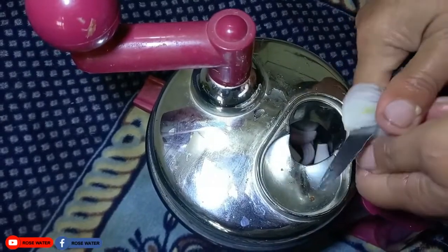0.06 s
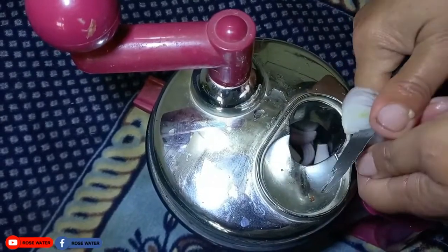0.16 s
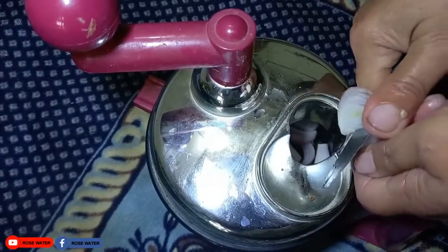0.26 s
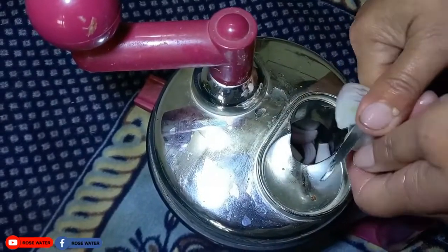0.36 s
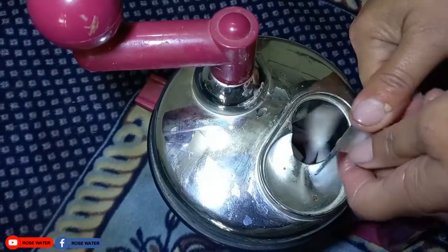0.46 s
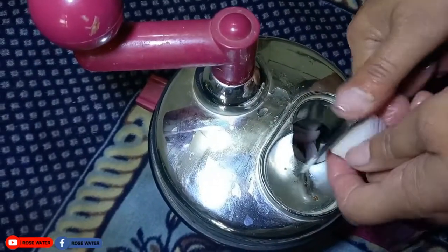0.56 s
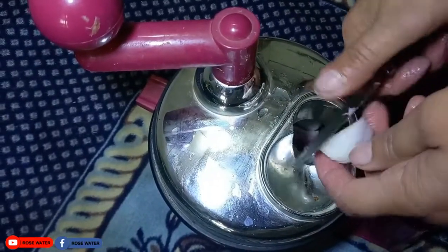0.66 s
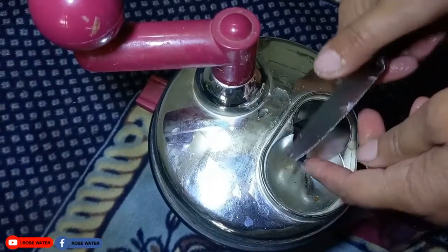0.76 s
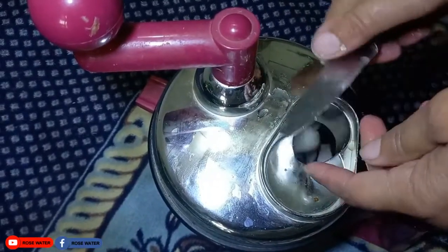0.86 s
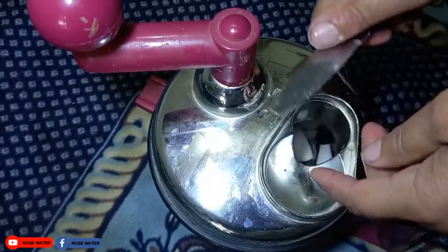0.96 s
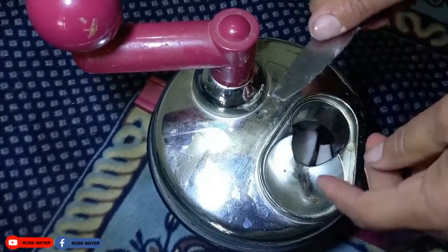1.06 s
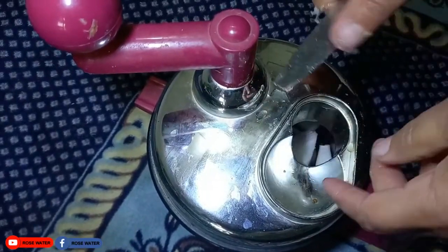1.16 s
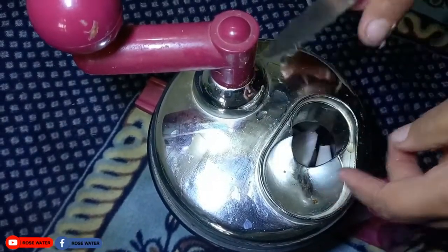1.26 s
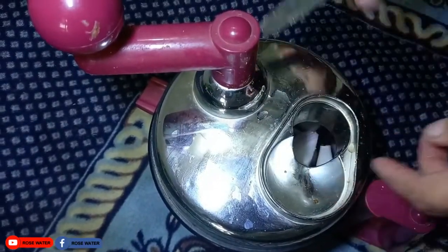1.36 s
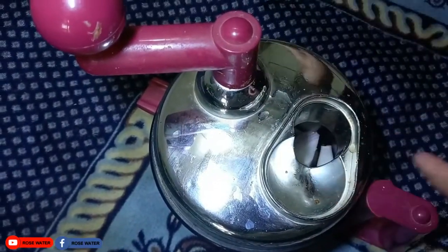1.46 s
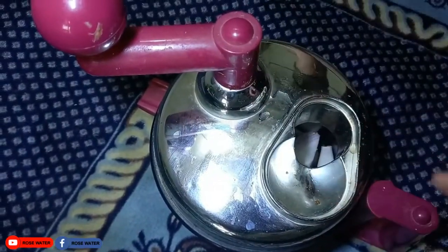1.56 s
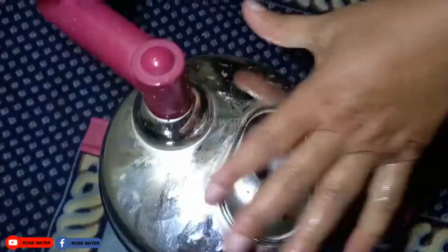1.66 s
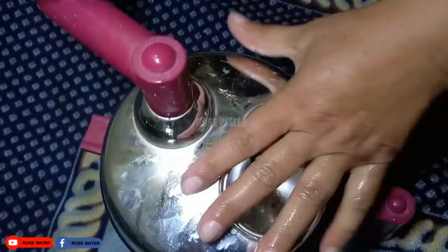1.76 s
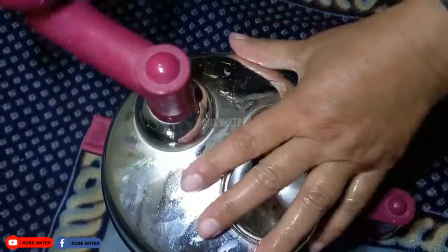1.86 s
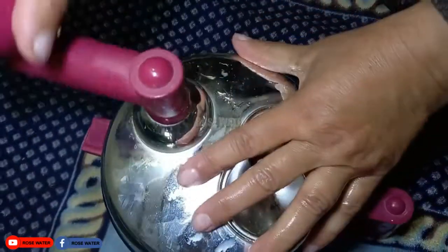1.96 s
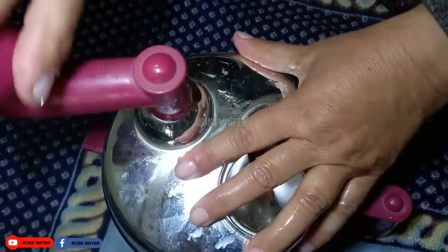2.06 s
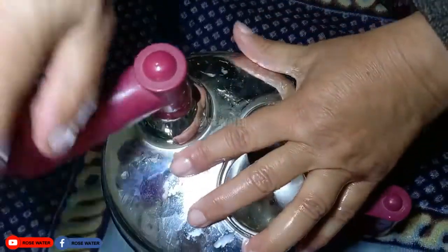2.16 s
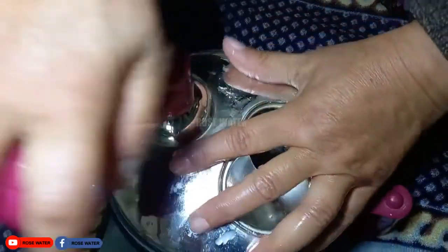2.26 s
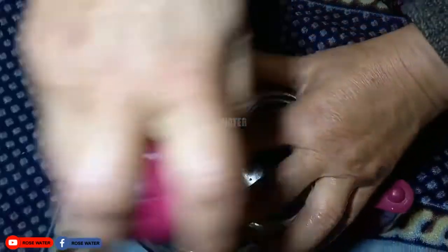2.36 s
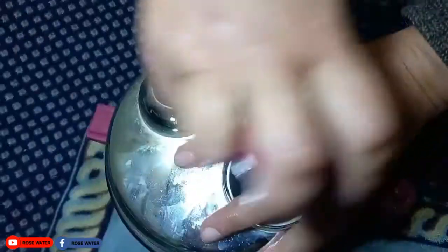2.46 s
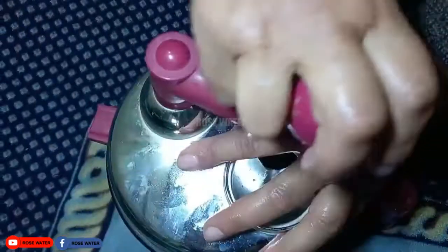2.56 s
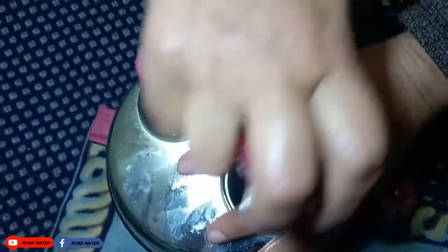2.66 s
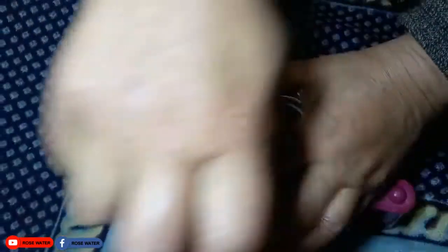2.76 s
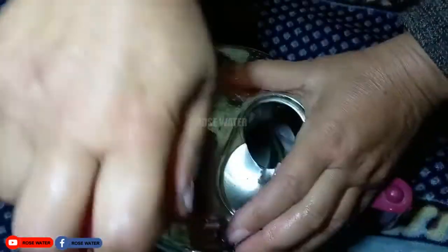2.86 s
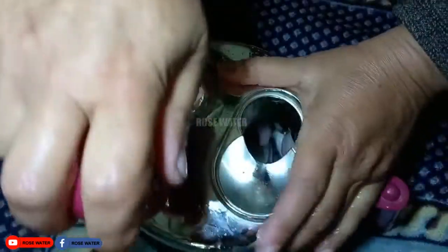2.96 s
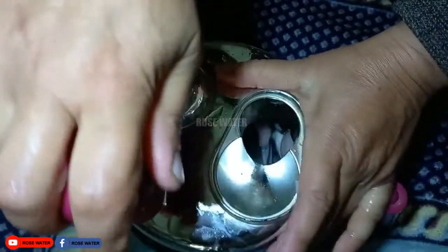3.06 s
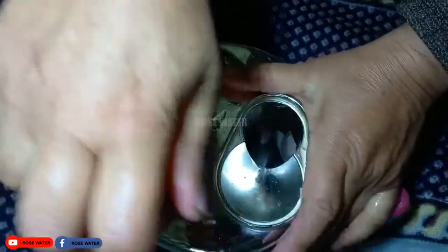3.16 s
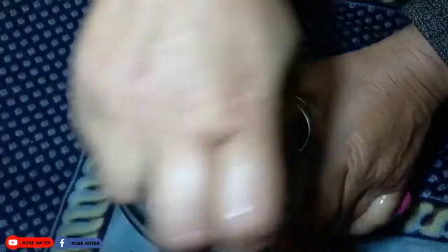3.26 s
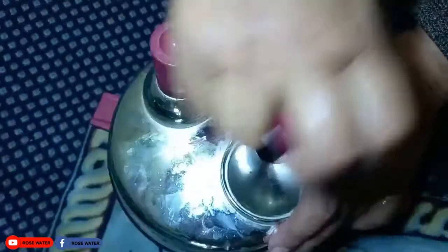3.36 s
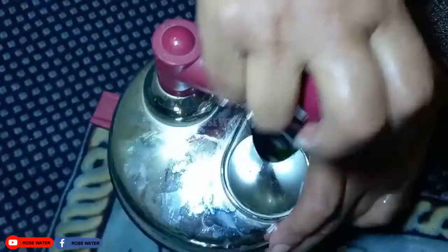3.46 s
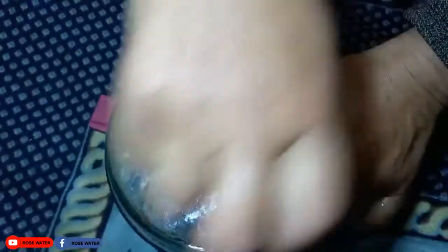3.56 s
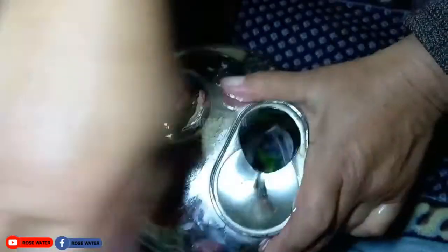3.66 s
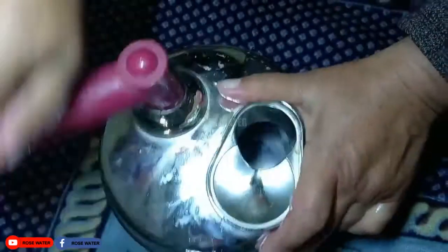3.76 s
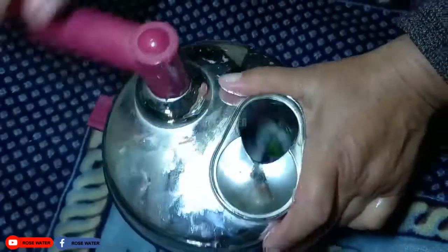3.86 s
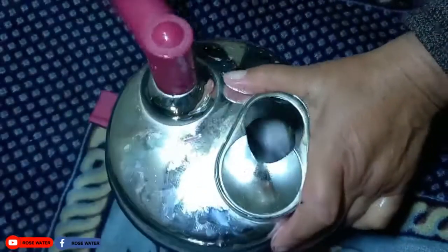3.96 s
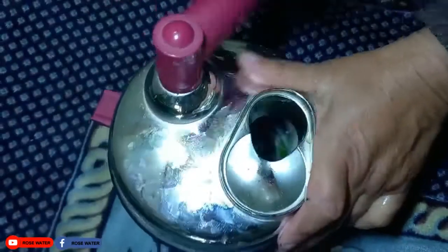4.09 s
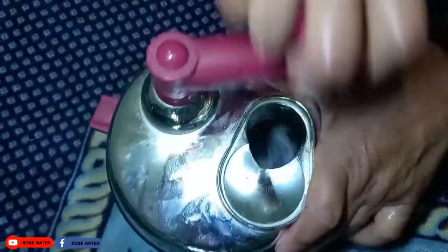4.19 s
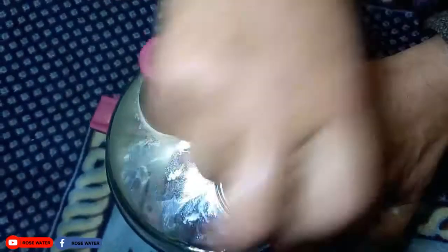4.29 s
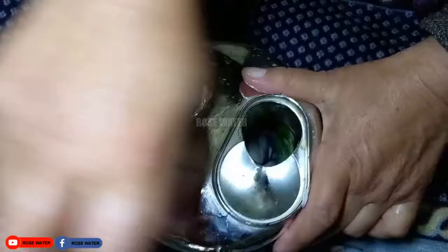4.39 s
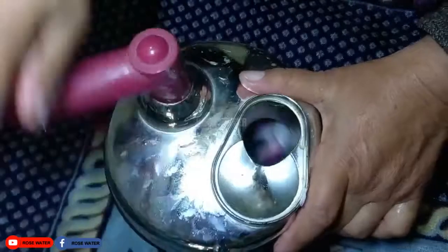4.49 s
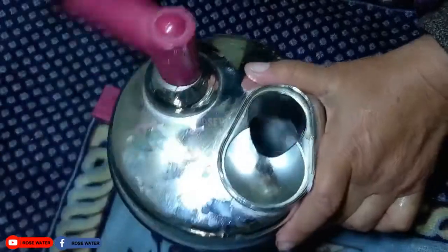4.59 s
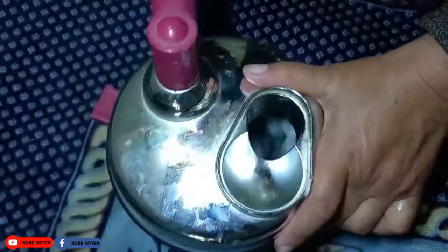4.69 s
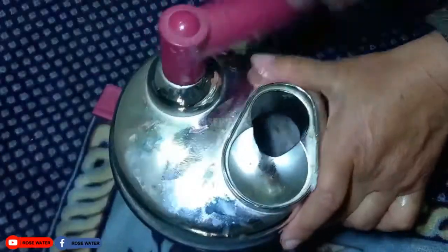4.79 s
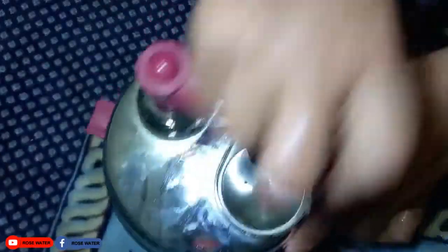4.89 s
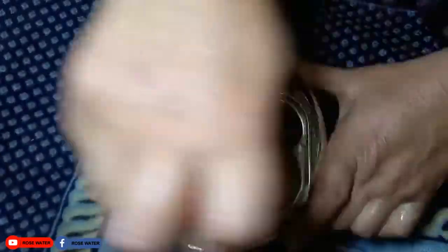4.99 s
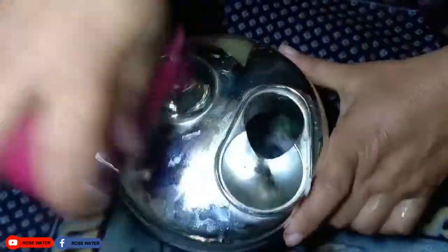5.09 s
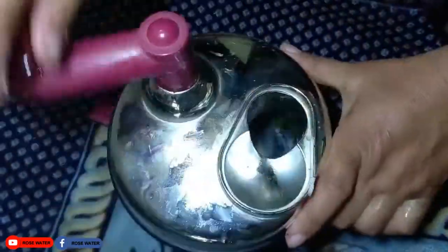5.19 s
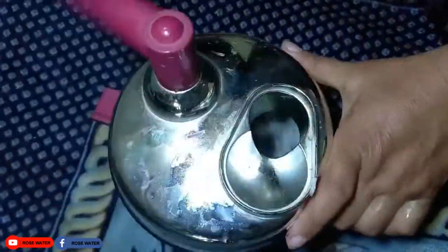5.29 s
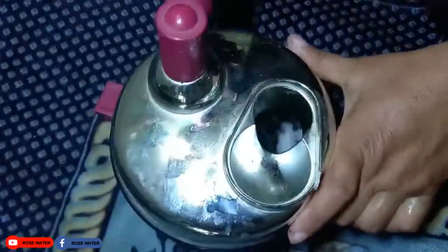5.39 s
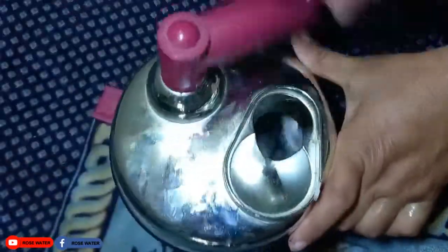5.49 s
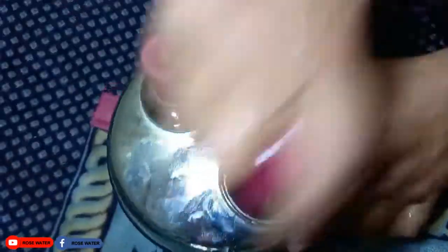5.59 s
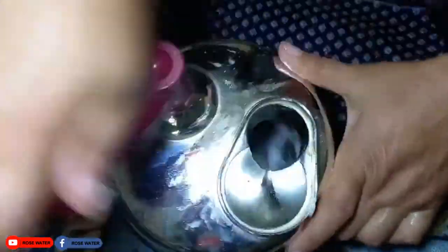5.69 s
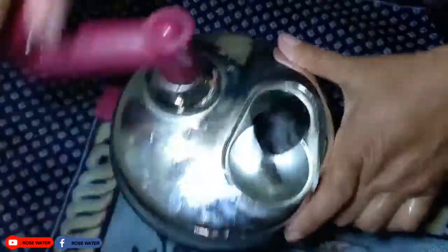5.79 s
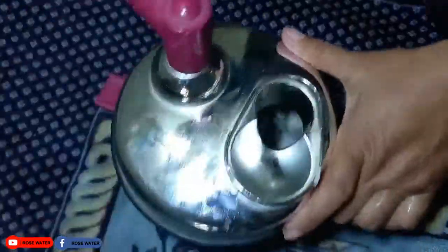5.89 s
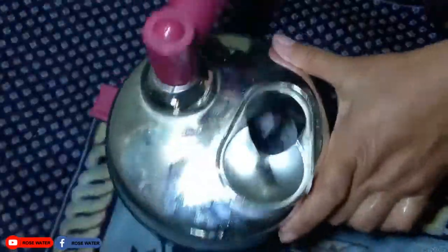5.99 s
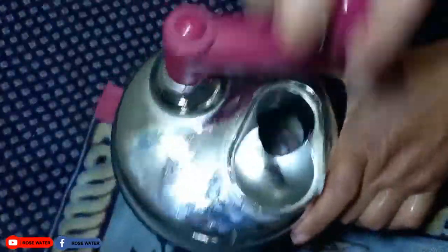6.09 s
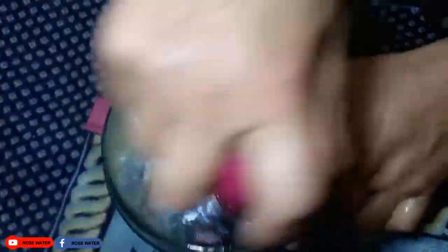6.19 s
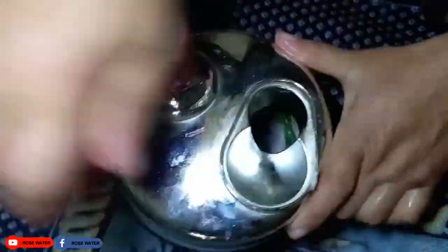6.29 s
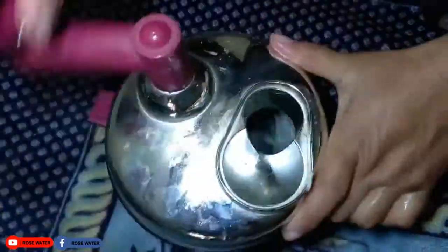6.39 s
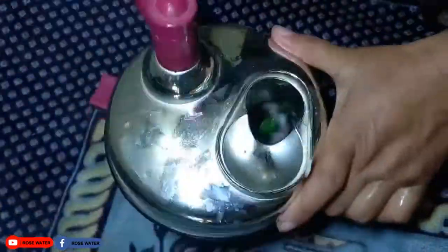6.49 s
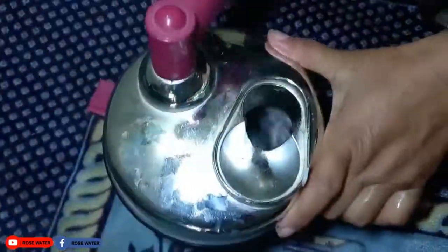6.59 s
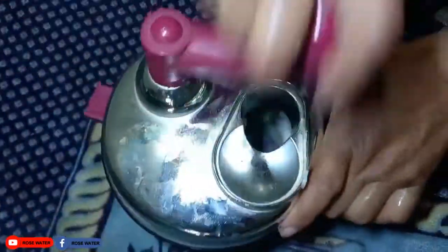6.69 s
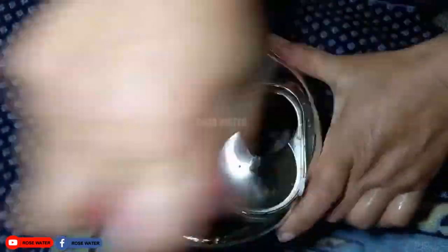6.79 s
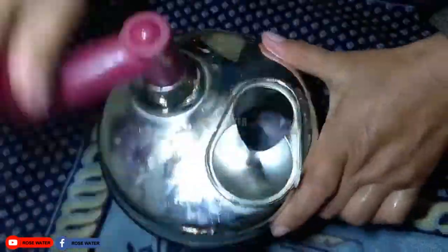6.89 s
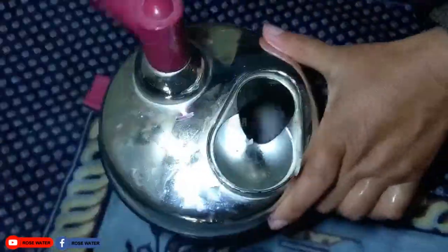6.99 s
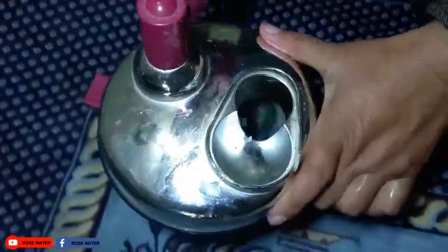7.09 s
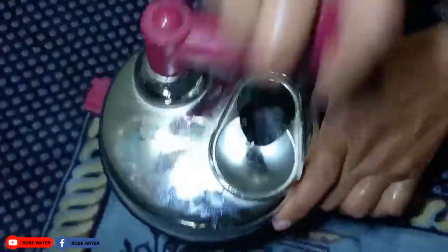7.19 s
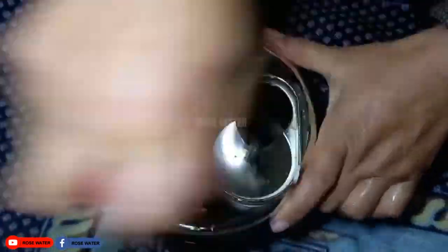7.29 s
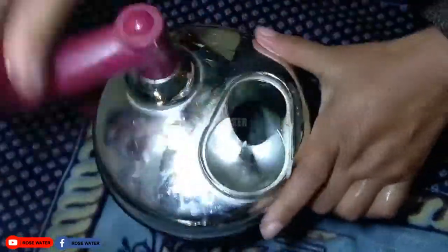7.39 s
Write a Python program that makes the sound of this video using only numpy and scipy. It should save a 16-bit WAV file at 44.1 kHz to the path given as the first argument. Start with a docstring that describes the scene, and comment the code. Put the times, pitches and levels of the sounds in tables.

```python
"""In a kitchen, close by: a knife slices onion into a hand-crank vegetable chopper standing on a cloth.
A palm lands on the lid; the crank starts, squeaks, stalls, then spins steadily. Modal resonance makes the bowl
boom under the chunks, random impacts through lid resonances make the clatter, filtered bursts make the wet spray
and the slicing, and noise about a gliding pitch makes the squeal. A diffuse tail and room noise surround them."""
import sys
import numpy as np
from scipy import signal
from scipy.fft import rfft, irfft, next_fast_len
from scipy.io import wavfile
from scipy.ndimage import uniform_filter1d

SR = 44100
rng = np.random.default_rng(int(sys.argv[2]) if len(sys.argv) > 2 else 0)


def to_wav(sig):
    """Store sig (one row per channel, or 1-D mono) as 16-bit WAV at the path in sys.argv[1].

    Samples outside -1..1 are clipped; the rate is SR.
    """
    pcm = np.clip(np.atleast_2d(sig), -1, 1) * 32767
    pcm = np.round(pcm).astype(np.int16)
    wavfile.write(sys.argv[1], SR, pcm.T)  # frames by channels


N = 328531
TIME = np.arange(N) / SR  # s
HZ = np.fft.rfftfreq(4096, 1 / SR)  # frequency grid of the colouring filters
EDGE_HZ = 15900  # upper band limit
FULL_TURNS_PER_S = 2.9  # crank speed that counts as full

# modes of the unloaded bowl: (f/Hz, relative level/dB, t60/s)
BOWL_MODES = [(221.1, -2.5, 0.2), (248.7, 0, 0.11), (283, -1.5, 0.075), (334.4, -3, 0.1),
              (386, -5.5, 0.058), (457, -11, 0.053), (551, -12.5, 0.14)]
# the bowl rings higher as its load is cut finer: (t/s, factor on its mode frequencies)
LIGHTENING = [(3.8, .972), (7.4, 1.06)]
# spectrum of wet bits and of blades rubbing through onion: (f/Hz, relative level/dB)
WET_SPECTRUM = [(500, -21), (2500, -1.5), (4800, -1.5), (6200, -1.5), (7200, -7.5), (8700, -3), (9700, -11),
                (12600, -6.5), (14000, -10.5), (16000, -10)]


def gain_of(db):
    """Level in decibels to amplitude ratio: 20 dB per decade."""
    return 10 ** (np.asarray(db) / 20)


def evened(x):
    """Normalization of signal power: scales to rms 1."""
    return x / np.sqrt(np.mean(x ** 2) + 1e-20)


def read(points, hz):
    """Linear interpolation of a curve along a logarithmic frequency axis."""
    f, value = np.transpose(points)
    return np.interp(np.log(hz + 1), np.log(f + 1), value)


def add(mix, s, sound):
    """Superposition: adds a sound into a mix, in place, from time s."""
    part = mix[..., max(round(s * SR), 0):][..., :sound.shape[-1]]
    part += sound[..., :part.shape[-1]]


def colour(x, db):
    """Minimum-phase filtering with the gain db on the grid HZ: its peaks ring after each click."""
    log_gain = np.log(gain_of(np.r_[db, db[-2:0:-1]]))
    # the Hilbert transform of the log gain gives the minimum phase
    response = np.exp(np.conj(signal.hilbert(log_gain)))
    taps = np.fft.ifft(response).real
    return signal.oaconvolve(x, taps[None], axes=1)[:, :x.shape[1]]


def impacts(per_s, spread_db):
    """Random point process: clicks, mostly small, a few large."""
    sizes = gain_of(spread_db * np.minimum(rng.exponential(1, N), 3.5))
    return sizes * (rng.random(N) < per_s / SR)


def crackle(clicks, t60, attack_s=0.00068):
    """Exponential decay of energy: each click sets off a short noise burst, as of densely packed modes."""
    keep, lag = gain_of(-120 / (max(t60, .001) * SR)), np.exp(-1 / (attack_s * SR))
    decay = signal.lfilter([1], [1, -keep], clicks ** 2)
    power = signal.lfilter([1 - lag], [1, -lag], decay)
    return np.sqrt(power) * rng.standard_normal((2, N))


def scatter(per_s, spread_db, t60, db, ripple_db, ripples, count):
    """Position-dependent excitation: random hits on a shell, each place with its own comb of resonances."""
    out = np.zeros((2, N))
    for place in range(count):
        comb_db = ripple_db * np.cos(2 * np.pi * (ripples * np.sqrt(HZ / 1000) + place / count))
        out += colour(crackle(impacts(per_s / count, spread_db), t60), db + comb_db)
    return evened(out)


def ring(modes, rise, favoured_hz=300, focus_db=0, low_hz=195):
    """Modal superposition after a soft blow, peak 1; the struck place favours modes near one pitch."""
    t = np.arange(SR // 3) / SR
    wave = np.zeros(len(t))
    for hz, db, t60 in modes:
        off_pitch_db = focus_db * abs(np.log2(hz / favoured_hz))
        wave += gain_of(db - 60 * t / t60 - off_pitch_db) * np.sin(2 * np.pi * hz * t)
    # a small body radiates little below its lowest mode
    low_cut = signal.butter(3, low_hz, "high", fs=SR)
    wave = signal.lfilter(*low_cut, wave * (1 - np.exp(-(t / rise) ** 2)))
    fade_out = np.clip(10 * (1 - t / t[-1]), 0, 1)
    return wave / abs(wave).max() * fade_out


def stroke(start, length, db, rise, fall):
    """Amplitude envelope of one rub: it swells and fades over shares of its length, and holds between."""
    u = (TIME - start) / length
    return gain_of(db) * np.clip(u / rise, 0, 1) * np.clip((1 - u) / fall, 0, 1) ** 2


def whistle(event, ratio, width_hz, grip_db, scoop=0.048, scoop_s=0.0089):
    """Narrow-band friction noise scoops up to its pitch, then sags, flickering as the grip comes and goes."""
    start, length, db, hz, sag = event
    t, out = np.arange(0, length, 1 / SR), np.zeros((2, N))
    pitch = ratio * hz * (1 - scoop * np.exp(-t / scoop_s) - sag * (t / length) ** 2)
    turns = np.cumsum(pitch) / SR
    noise = rng.standard_normal((2, len(t))) + 1j * rng.standard_normal((2, len(t)))
    wobble = signal.lfilter(*signal.butter(2, width_hz / 2, fs=SR), noise)
    grip = gain_of(grip_db * evened(uniform_filter1d(rng.standard_normal(len(t)), size=400)))
    # modulation by a complex carrier moves the noise band up to the pitch
    tone = evened(grip * (wobble * np.exp(2j * np.pi * turns)).real)
    add(out, start, gain_of(db) * tone * signal.windows.tukey(len(t), .5))
    return out


def speed():
    """Kinematics of the crank: its speed as a share of full speed."""
    # the crank starts, stalls, then spins steadily: (t/s, speed/turns per s)
    crank_turns = [(2.15, 0.03), (2.178, 0.97), (2.41, 1.21), (2.62, 2.78), (2.69, 1.63), (2.82, 1.45),
                   (2.96, 2.13), (3.08, 0.8), (3.15, 0.3), (3.2, 0.018), (3.345, 0.023), (3.365, 1.8),
                   (3.48, 1.29), (3.62, 1.97), (3.78, 3.13), (5.6, 2.92), (6.3, 2.98), (7.1, 3.06),
                   (7.45, 2.78)]
    return np.maximum(np.interp(TIME, *np.transpose(crank_turns), left=0), 0) / FULL_TURNS_PER_S


def heaps(crumbs, chunks):
    """Amplitude modulation by the blade's sweeps; each layer responds to crumbs and chunks by its own amounts."""
    # a blade ploughs through a heap: (t/s at the height, length/s, swell/dB before the layer's response,
    # size of the pieces from 0 wet crumbs to 1 big chunks)
    sweeps = [(2.31, 0.36, 2.5, 0.33), (2.575, 0.26, 5, 0.93), (2.901, 0.088, 7, .2),
              (3.501, 0.18, 13.5, 0.51), (3.85, 0.32, 0, 0.092), (4.237, 0.062, 4, 0.09),
              (4.464, 0.17, 5.5, 0.84), (4.613, 0.11, 7, 0.68), (4.918, 0.25, 2.5, 0.097),
              (5.056, 0.16, 5, 0.97), (5.312, 0.13, 7.5, 0.73), (5.52, 0.26, 5.5, 0.81),
              (5.742, 0.33, 7, 0.73), (5.857, 0.06, 9, 0.76), (6.165, 0.15, 7, 0.81),
              (6.487, 0.13, 3.5, 0.14), (6.832, 0.38, 2.5, 0.12), (7.02, 0.12, 4, 0.32),
              (7.203, 0.24, 6, 0.63), (7.379, 0.16, 6.5, 1)]
    swell_db = np.zeros(N)
    for s, length, db, size in sweeps:
        arch = np.cos(np.pi * np.clip((TIME - s) / length, -.5, .5))
        swell_db += db * arch * (crumbs + (chunks - crumbs) * np.clip(size, 0, 1))
    return gain_of(swell_db)


def lid_db():
    """Resonant transmission: the colour, in dB, of anything that strikes under the lid."""
    # underlying spectrum of the clatter: (f/Hz, relative level/dB)
    clatter_spectrum = [(30, -8.5), (120, -0.5), (350, 7.5), (650, -4), (900, 0.5), (1500, -3.5),
                        (2700, -9.5), (3500, -12.5), (4100, -14), (6200, -19.5), (9500, -26.5),
                        (16000, -27.5)]
    # resonances of the lid: (f/Hz, width/Hz, lift/dB)
    lid_resonances = [(544, 35, 5.5), (770, 160, 5), (905, 20, 5), (991, 41, 4), (1259, 57, 9.5),
                      (1982, 190, 7), (2350, 300, 7), (3080, 1040, 7), (3663, 120, 6.5), (8160, 410, 0.5)]
    lift_db = sum(db / (1 + (2 * (HZ - hz) / width) ** 2) for hz, width, db in lid_resonances)
    return read(clatter_spectrum, HZ) + lift_db


def loaded(factor):
    """Mass loading: the load that lies against the wall shifts the bowl's modes."""
    return [(hz * factor, db, t60) for hz, db, t60 in BOWL_MODES]


def quiet(level_db=-73.0):
    """Stationary filtered noise: low room rumble and a faint hiss."""
    # spectrum of the room: (f/Hz, relative level/dB)
    room_spectrum = [(20, -11), (55, -9), (100, 3), (200, -6), (350, -10), (800, -15.5), (1300, -15),
                     (2000, -15.5), (3000, -28), (16000, -25.5)]
    return gain_of(level_db) * evened(colour(rng.standard_normal((2, N)), read(room_spectrum, HZ)))


def kitchen(x):
    """Diffuse reverberation: a short noise tail, each band decaying exponentially at its own rate."""
    # decay of the kitchen: (f/Hz, t60/s)
    room_decay = [(100, 0.41), (400, 0.3), (1500, 0.41), (5000, 0.17), (15000, 0.24)]
    # the tail starts 12 ms after the direct sound
    taps = rng.standard_normal((2, SR // 2)) * (np.arange(SR // 2) > .012 * SR)
    hz, t, z = signal.stft(taps, SR, nperseg=256)
    tail = signal.istft(z * gain_of(-60 * t / read(room_decay, hz)[:, None]), SR)[1]
    return signal.fftconvolve(x, tail / np.linalg.norm(tail[0]), axes=1)[:, :N]


def brushing(level_db=1):
    """Friction noise: skin and sleeve rub on lid and cloth, each touch starting quickly and trailing off."""
    # spectrum of the rubbing: (f/Hz, relative level/dB)
    cloth_spectrum = [(88, -24), (150, -6), (175, -18), (303, -4.5), (730, -14.5), (941, -22),
                      (1760, -19.5), (2140, -17), (2310, -21), (16000, -34)]
    # hand and sleeve brush over the chopper: (t/s at the start, length/s, relative level/dB, left-right/dB)
    brushes = [(1.37, 0.62, -74, -5), (1.54, 1, -68.5, -10.5), (1.79, 0.19, -54.5, -3),
               (2.113, 0.55, -62, 0)]
    rub = evened(colour(crackle(impacts(1500, 0.86), t60=0.054), read(cloth_spectrum, HZ)))
    envelope = np.zeros((2, N))
    for start, length, db, side_db in brushes:
        sides = gain_of([[side_db / 2], [-side_db / 2]])
        envelope += stroke(start, length, db + level_db, rise=0.077, fall=0.75) * sides
    return rub * envelope


def fingers():
    """Friction noise: fingertips slide along the rim of the opening."""
    # spectrum of the rustle: (f/Hz, relative level/dB)
    rustle_spectrum = [(500, -34), (1100, -16), (1800, 2), (2300, -18), (3000, -25), (16000, -44)]
    # slides of the fingertips: (t/s at the start, length/s, level/dB)
    touches = [(.36, 0.69, -76), (0.892, 0.36, -68.5)]
    rustle = evened(colour(crackle(impacts(2000, 1.9), t60=0.015), read(rustle_spectrum, HZ)))
    return rustle * sum(stroke(*row, rise=0.13, fall=0.77) for row in touches)


def knife(level_db=3):
    """Fracture noise: onion cells burst in a fine fizz, a faint scrape follows; now and then a layer snaps."""
    # spectra of the fizz and of the snaps: (f/Hz, relative level/dB)
    sliding_spectrum = [(300, -46), (2500, -13), (4500, -9), (7000, -8.5), (10500, -10), (16000, -8)]
    onion_spectrum = [(300, -51), (1300, -18), (2200, -1.5), (3200, -13), (5500, -1.5), (7200, -2.5),
                      (10000, -3.5), (16000, -9)]
    # strokes through the onion, then a faint scrape with bits dropping:
    # (t/s at the start, length/s, relative level/dB, f/Hz below which the fizz is 7 dB weaker)
    fizz_events = [(-.05, 0.33, -59.5, 3600), (0.195, 0.47, -57, 6200), (0.533, 0.35, -70, 5000)]
    # snaps of vegetable and small ticks: (t/s, level/dB, length/s, first-second channel/dB ahead of the ports)
    snap_events = [(0.091, -42.5, 0.025, 0), (0.13, -45, 0.024, -1), (0.328, -56, 0.019, -1),
                   (0.558, -63.5, 0.012, 2), (0.622, -60, 0.012, 5), (0.636, -56, 0.012, 8),
                   (1.0, -67, 0.017, 0), (1.706, -63, 0.0024, -18), (1.809, -52, 0.024, -3),
                   (1.938, -65, 0.0035, -16), (2.47, -44, 0.012, 2), (3.173, -57, 0.029, -3)]
    fizz, snaps = np.zeros((2, N)), np.zeros((2, N))
    for start, length, db, edge_hz in fizz_events:
        fizz_db = read(sliding_spectrum, HZ) - 7 / (1 + (HZ / edge_hz) ** 8)
        bursts = colour(crackle(impacts(2100, 2.2), t60=0.0056), fizz_db)
        fizz += evened(bursts) * stroke(start, length, db + level_db, rise=0.41, fall=0.58)
    crunch = evened(colour(crackle(impacts(2700, 1.2), t60=0.01), read(onion_spectrum, HZ)))
    for s, db, length, side_db in snap_events:
        sides = gain_of([[db + side_db / 2], [db - side_db / 2]])
        add(snaps, s, sides * np.hanning(max(round(length * SR), 8)))
    return fizz + crunch * snaps


def squeak(upper_db=-7.5, overtone=2.29, rasp_db=-1.0):
    """Stick-slip friction: the dry shaft squeals with a rasp and a fuzzy overtone; skin rubs with a lower note."""
    # a brief hollow rub as the hand reaches in, then the dry crank shaft's three slips:
    # (t/s at the start, length/s, level/dB, nominal f/Hz, share of the pitch lost by the end)
    hand_rub = (1.565, .09, -64.5, 1030, .1)
    squeals = [(2.783, .05, -47, 4850, .01), (2.824, .125, -52, 4930, .025), (2.955, .09, -49, 4780, .14)]
    out = whistle(hand_rub, 0.93, width_hz=160, grip_db=2.5)
    for piece in squeals:
        out += whistle(piece, 1, width_hz=170, grip_db=4)
        out += gain_of(rasp_db) * whistle(piece, .92, width_hz=850, grip_db=-3)
        out += gain_of(upper_db) * whistle(piece, overtone, width_hz=1200, grip_db=3.5)
    return out


def scrape(level_db=-55, speed_power=0.7):
    """Sliding friction: the blades rub steadily through the onion as long as the crank turns."""
    rub = evened(colour(crackle(impacts(3000, 1.5), t60=.02), read(WET_SPECTRUM, HZ)))
    return rub * gain_of(level_db) * speed() ** speed_power


def spray(level_db=-42.0, speed_power=2.37, spin_up_s=0.11):
    """Droplet impacts: torn flesh and wet crumbs hit the wall once the load has caught up with the blades."""
    hits = scatter(per_s=520, spread_db=5, t60=0.079, db=read(WET_SPECTRUM, HZ),
                   ripple_db=6.0, ripples=1.69, count=5)
    # the load lags as the crank speeds up, but slows with it at once
    keep = np.exp(-1 / (spin_up_s * SR))
    whirl = np.minimum(speed(), signal.lfilter([1 - keep], [1, -keep], speed()))
    return hits * gain_of(level_db) * whirl ** speed_power * heaps(crumbs=2.3, chunks=-0.14)


def clatter(level_db=-34.0, speed_power=1.9):
    """Impact noise through a resonant shell: blades and bits rattle on the lid, denser and louder with speed."""
    hits = scatter(per_s=330 * np.sqrt(speed()), spread_db=3.5, t60=0.049, db=lid_db(),
                   ripple_db=5.5, ripples=2.574, count=7)
    return hits * gain_of(level_db) * speed() ** speed_power * heaps(crumbs=1.17, chunks=0.63)


def clacks(level_db=-13.5, t60=0.088, crack_db=5, crack_t60=0.0087, focus_db=7, focus_octaves=0.43,
           note_db=2, note_t60=0.037, rise_s=.0008, grit_db=3):
    """Broadband impact: a hard edge strikes with a short crack, a gritty ring, and one note of the place hit."""
    # hits of knife, blades and chunks on the lid: (t/s, relative level/dB, strongest f/Hz, treble lift/dB)
    hard_hits = [(0.627, -53, 786, -16), (0.956, -57, 2320, 29), (1.011, -44, 1370, -10),
                 (2.09, -45.5, 2160, 9), (2.168, -37, 2140, 7), (2.379, -31.5, 840, 10),
                 (2.441, -28, 1275, -17), (2.478, -25.5, 1980, 20), (2.5, -19.5, 2180, -10),
                 (2.546, -14.5, 990, -16), (2.608, -18.5, 1210, -16), (2.622, -16, 1160, 9),
                 (2.641, -10.5, 1297, -18), (2.918, -21, 1960, -10), (3.192, -46, 2020, 4),
                 (3.361, -27, 1210, -9), (3.429, -19.5, 990, -17), (3.471, -22.5, 850, -6),
                 (3.501, -18, 1250, -5), (3.632, -21.5, 1248, -16), (3.73, -14.5, 1240, -15),
                 (3.821, -13.5, 1040, 13.5), (3.956, -11, 1933, -16), (4.093, -13, 1090, 11),
                 (4.185, -17.5, 2000, 14), (4.258, -18, 2030, 10), (4.296, -13, 748, -6),
                 (4.31, -15, 790, -11), (4.483, -8, 2140, 14), (4.798, -9, 876, -5),
                 (4.922, -11.5, 1940, 6), (5.291, -15.5, 875, 6), (5.523, -16, 2120, 8),
                 (5.82, -11, 955, 5), (6.009, -15.5, 780, 16), (6.15, -17, 980, 4), (6.38, -12, 978, -9),
                 (6.423, -16.5, 886, -14), (6.451, -10, 1014, 0), (6.827, -13, 2280, 5),
                 (7.18, -13.5, 1290, -23)]
    out, t = np.zeros((2, N)), np.arange(SR // 6) / SR
    for s, db, hz, treble_db in hard_hits:
        decay = gain_of(-60 * t / t60) + gain_of(crack_db - 60 * t / crack_t60)
        burst = rng.standard_normal((2, len(t))) * decay
        burst *= gain_of(grit_db * evened(uniform_filter1d(rng.standard_normal(len(t)), size=130)))
        place_db = focus_db / (1 + (np.log2((HZ + 1) / hz) / focus_octaves) ** 2)
        hardness_db = treble_db * HZ ** 4 / (HZ ** 4 + 4000 ** 4)
        low_cut_db = 9 / (1 + (HZ / 550) ** 4)
        hit = colour(burst, lid_db() + place_db + hardness_db - low_cut_db)
        hit /= hit[:, :SR // 50].std()  # levelled over the first 20 ms
        # the duller the hit, the more its note stands out
        note_decay = gain_of(note_db - 0.67 * treble_db - 60 * t / note_t60)
        hit[0] += note_decay * np.sin(2 * np.pi * hz * t)
        add(out, s, gain_of(db + level_db) * hit * (1 - np.exp(-t / rise_s)))
    return out


def tumbling(per_s=170, spread_db=3, level_db=-37, speed_power=0.59, load_shift=.06, focus_db=6, count=21):
    """Modal excitation of a loaded shell: chunks bump the bowl at many detuned places, more often with speed."""
    out, trend = np.zeros((2, N)), np.interp(TIME, *np.transpose(LIGHTENING))
    factors = np.linspace(trend.min() - load_shift, trend.max() + load_shift, count)
    for place, factor in enumerate(factors):
        # detunings near the present load are the likeliest
        likely = np.exp(-((factor - trend) / load_shift) ** 2)
        rate = 2 * per_s * speed() * likely / count
        bumps = np.array([impacts(rate, spread_db) for _ in range(2)])
        thud = ring(loaded(factor), 0.00074, BOWL_MODES[place % len(BOWL_MODES)][0], focus_db)
        out += signal.oaconvolve(bumps, rng.choice([-1, 1]) * thud[None], axes=1)[:, :N]
    return evened(out) * gain_of(level_db) * speed() ** speed_power * heaps(crumbs=0.14, chunks=1.23)


def knocks(level_db=-4, contact_db=-23, scuff_t60=0.36, rock_db=-30, soft_focus_db=24, hard_focus_db=11):
    """Struck-shell resonance: large pieces thud and scuff in the bowl and rock it; the hand rocks it too."""
    # dull blows on the bowl: (t/s, relative level/dB, f/Hz that the struck place favours)
    blows = [(0.573, -52, 215), (0.625, -37, 253), (0.679, -20, 298.4), (0.6923, -26, 267),
             (0.73, -33, 274), (0.918, -38, 260), (0.956, -39, 204), (1.009, -28.5, 301),
             (1.165, -51.5, 219), (2.173, -33, 238), (2.23, -32, 238), (2.316, -26.5, 234),
             (2.399, -21.5, 238), (2.564, -10.5, 231), (2.582, -15, 236), (2.601, -16.5, 224),
             (3.19, -24.5, 240), (3.389, -20, 244), (3.449, -22, 248), (3.505, -19, 204), (3.732, -12, 303),
             (3.824, -23, 253), (3.909, -16.5, 227), (3.958, -12.5, 233), (4.13, -21.5, 218),
             (4.203, -20.5, 230), (4.309, -18, 235), (4.328, -20.5, 276), (4.391, -23, 214),
             (4.43, -22, 228), (4.648, -14.5, 348), (4.74, -14, 250), (4.799, -13.5, 231),
             (5.082, -11.5, 252), (5.205, -7, 276), (5.241, -13, 328), (5.554, -12, 228),
             (5.661, -13.5, 310), (5.768, -15, 250), (5.821, -8, 309), (5.842, -14, 285),
             (6.131, -15.5, 340), (6.428, -11.5, 267), (6.825, -13, 228), (6.993, -9.5, 325),
             (7.232, -7.5, 266), (7.328, -8.5, 285), (7.373, -21, 285)]
    # the palm and fingers land on the lid: (t/s, level/dB)
    pats = [(1.807, -27), (1.831, -25.5), (2.033, -45)]
    # modes of the whole chopper rocking on the cloth: (f/Hz, relative level/dB, t60/s)
    rocking_modes = [(71, -21.5, 0.83), (93, 6.5, 0.048), (109, -13, 0.45), (173, -6, 0.06),
                     (279, -6.5, 0.041)]
    out, t = np.zeros((2, N)), np.arange(SR // 3) / SR
    rock = ring(rocking_modes, 0.0036, low_hz=54)
    for s, db, hz in blows:
        # the struck patch of wall, loaded by the piece, sounds along with the bowl's own modes;
        # hard blows wake more of them
        focus_db = np.interp(db, [-22, -9], [soft_focus_db, hard_focus_db])
        modes = [(hz, 4, .07), *loaded(np.interp(s, *np.transpose(LIGHTENING)))]
        thud = ring(modes, 0.0031, hz, focus_db, low_hz=164)
        add(out[0], s, gain_of(db + level_db) * thud + gain_of(db + rock_db) * rock)
        scuff = rng.standard_normal((2, len(t))) * gain_of(-60 * t / scuff_t60)
        add(out, s, gain_of(db + contact_db) * colour(scuff, lid_db() - 9 * np.log2(1 + HZ / 1500)))
    for s, db in pats:
        add(out[0], s, gain_of(db) * rock)
    return out


def ports(x):
    """Partial coherence: two signals become the partly alike, phase-shifted pair at two microphone ports."""
    # coherence of the ports: (f/Hz, likeness from 0 to 1)
    port_likeness = [(100, 0.84), (230, 0.99), (350, 1), (470, 1), (600, 0.053), (780, 0.86), (1250, 0.46),
                     (1450, 0.12), (2000, 1), (2600, 0.49), (3100, 0.43), (5000, 0.27), (10000, 0.036)]
    # level difference of the ports: (f/Hz, left-right/dB)
    port_balance = [(150, 0.5), (250, -1), (350, -4), (490, -3.5), (600, 5), (930, 0.5), (1150, 2.5),
                    (2300, 4), (3200, -5.5), (5000, 5.5), (8700, 2.5), (10500, 5.5), (12700, 5),
                    (15000, 13)]
    # phase by which left leads, before the reduction below 400 Hz: (f/Hz, phase/rad)
    port_lead = [(200, 0), (400, 1.09), (600, -1), (780, 1), (1250, 2), (2000, 5.5), (2300, 8.5),
                 (3000, 8.5), (4000, 16.5), (4800, 17.5), (7000, 22.5)]
    size = next_fast_len(x.shape[1] + 512)
    hz, (a, b) = np.fft.rfftfreq(size, 1 / SR), rfft(x, size)
    same, side = np.clip(read(port_likeness, hz), 0, 1), gain_of(read(port_balance, hz))
    lead = read(port_lead, hz) * np.minimum(hz / 400, 1) ** 2  # long waves reach both ports in step
    right = (same * a + np.sqrt(1 - same ** 2) * b) * np.exp(-1j * lead)
    even_power = np.sqrt(2 / (1 + side ** 2))
    return irfft(np.array([a * side, right]) * even_power, size)[:, :x.shape[1]]


def scene():
    """Superposition of direct, reverberant and background sound at the ports; the brushing is added in stereo."""
    near = knife() + fingers() + squeak() + scrape() + spray() + clatter() + clacks() + tumbling() + knocks()
    return ports(near + gain_of(-11.0) * kitchen(near) + quiet()) + brushing()


def record(dry):
    """Linear-phase low-pass filtering: limits the band at EDGE_HZ."""
    low_pass = signal.firwin(511, EDGE_HZ, window=("kaiser", 9), fs=SR)
    return signal.oaconvolve(dry, low_pass[None], "same")


dry = scene()
out = record(dry)
to_wav(out)
```